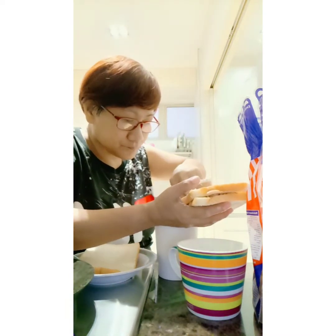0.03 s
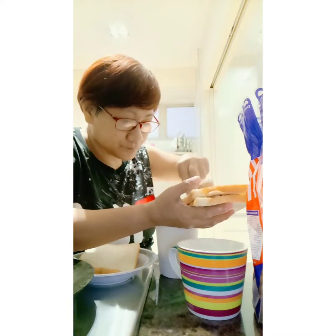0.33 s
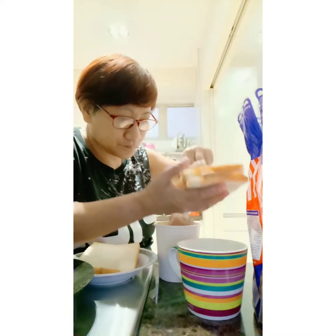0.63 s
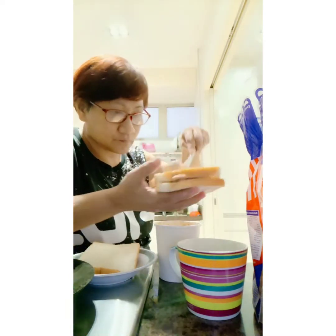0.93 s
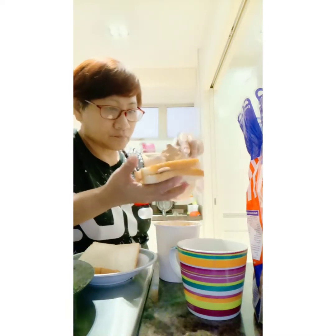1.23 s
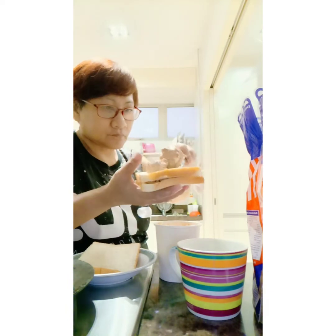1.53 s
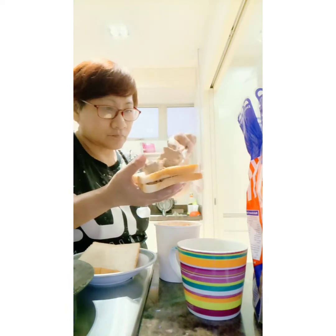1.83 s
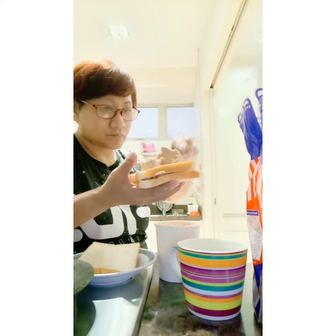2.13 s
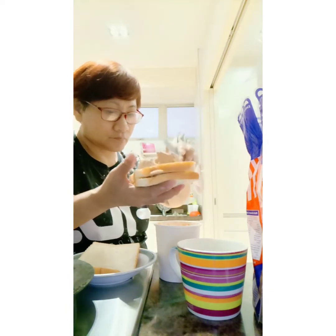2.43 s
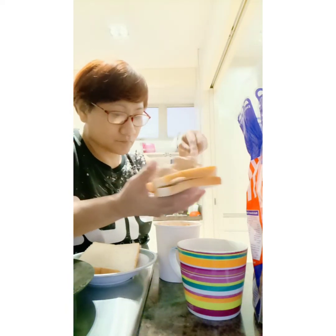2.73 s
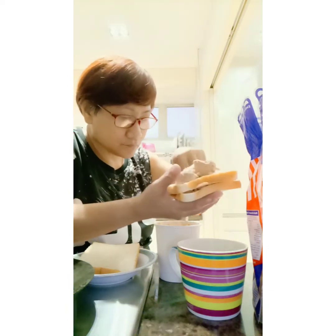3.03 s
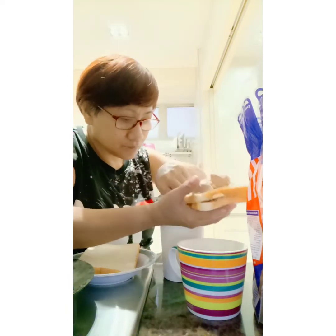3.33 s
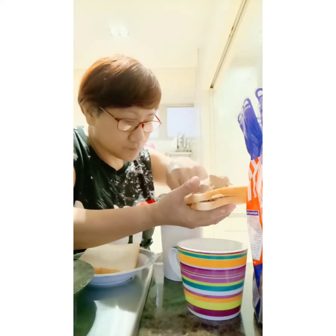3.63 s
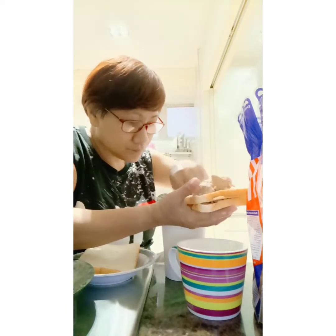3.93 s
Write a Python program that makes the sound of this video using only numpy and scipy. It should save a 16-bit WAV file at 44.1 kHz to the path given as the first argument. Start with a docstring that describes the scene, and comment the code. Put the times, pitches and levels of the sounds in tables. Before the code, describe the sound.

Dull knife knocks on a plastic tub, with faint scrapes across bread over room hiss.

```python
"""Over room hiss and an appliance's hum, a knife knocks on a plastic tub and scrapes on bread, by turns.
The slice is spread and turned in the hands in a small, hard-walled kitchen. Each dull knock excites
damped modes of the tub. Stick-slip friction makes the knife's soft scrapes and faint squeaks and the
rustle of the fingers; the bread rubs softly on the palm. The walls add a short reverberation."""
import sys
import numpy as np
from scipy import signal
from scipy.fft import rfft, irfft
from scipy.io import wavfile
from scipy.ndimage import uniform_filter1d

SR = 44100
rng = np.random.default_rng(int(sys.argv[2]) if len(sys.argv) > 2 else 0)


def store_wav(level_fs):
    """Save 16-bit WAV to argv[1]."""
    pcm = np.round(np.clip(np.atleast_2d(level_fs), -1, 1) * 32767)
    wavfile.write(sys.argv[1], SR, pcm.T.astype(np.int16))


N = 176400
TIME = np.arange(N) / SR
FREQS = np.maximum(np.arange(N // 2 + 1) * SR / N, 1)

# Levels in the tables are relative.
# room noise: (frequency [Hz], level [dB])
AIR_SPECTRUM = [(25, -15), (50, -2), (66, -2.5), (100, 5.5), (150, -9.5), (185, 0.5), (230, -0.5),
                (300, -6.5), (420, -3), (600, -4.5), (800, -17), (1100, -16.5), (1600, -21.5),
                (2050, -19.5), (2600, -17), (3200, -19.5), (3900, -22), (5600, -22.5), (8000, -28.5),
                (9800, -30), (12500, -29.5), (15500, -35.5)]
# balance of the room noise: (frequency [Hz], left minus right [dB])
AIR_BALANCE = [(250, 1.5), (500, 1.5), (1000, 3), (2500, 0.7), (5000, 1), (8000, -4), (12000, 7)]
# diffuse field: (frequency [Hz], left-right correlation [0..1])
COHERENCE = [(250, 1), (500, 0.9), (1000, 0.026), (2000, 0), (14000, 0)]
# reflections from counter and near walls: (left delay [s], right delay [s], level [dB])
REFLECTIONS = [(.0045, .0032, -26), (.0085, .0098, -20), (.018, .0167, -46)]
# appliance resonances: (frequency [Hz], half-width [Hz], level [dB])
HUM_BANDS = [(102.7, 11.7, -54), (147, 12.1, -45.5)]
# chance swells and dips of the hum, applied about their mean: (time [s], level [dB])
HUM_SWELLS = [(0.0, -45.5), (0.96, -45.5), (1.0, -56), (1.27, -42.5), (1.51, -47), (2.87, -49.5),
              (3.05, -41), (3.12, -54.5), (3.16, -44.5), (3.52, -47.5), (3.54, -36.5), (3.61, -59.5),
              (3.71, -45.5), (3.93, -46.5), (3.97, -57), (4.0, -36)]
# bread on the palm: (peak time [s], rise [s], fall [s], level [dB])
PALM_RUBS = [(0.09, 0.044, 0.022, -46.5), (3.03, 0.0067, 0.034, -46), (3.182, 0.005, 0.038, -41.5),
             (3.42, 0.027, 0.024, -44.5), (3.5, 0.067, 0.061, -43), (3.87, 0.028, 0.051, -44.5)]
# colour of that rubbing: (frequency [Hz], level [dB])
RUB_SPECTRUM = [(150, -7), (400, 4.5), (700, 0), (1200, -12.5), (2500, -26.5)]
# finger movements: (peak time [s], rise [s], fall [s], level [dB])
FINGER_RUSTLES = [(0.14, 0.096, 0.061, -57), (0.412, 0.0062, 0.034, -48), (0.55, 0.015, 0.051, -60),
                  (0.75, .015, 0.035, -62), (0.928, 0.015, 0.0084, -56), (1.19, 0.056, 0.039, -55.5),
                  (1.506, 0.012, 0.13, -56.5), (1.73, 0.0074, 0.0095, -53.5), (2.128, 0.015, 0.1, -53),
                  (2.44, 0.049, 0.13, -54.5), (2.64, 0.057, 0.12, -60), (3.053, 0.0076, 0.03, -44),
                  (3.17, .05, 0.085, -51.5), (3.34, 0.069, 0.13, -58), (3.497, 0.069, 0.033, -50.5),
                  (3.84, 0.045, .08, -58)]
# colour of their rustle: (frequency [Hz], level [dB])
RUSTLE_SPECTRUM = [(3000, -1), (6000, -4.5), (8500, -1), (9800, -5.5), (11300, 0.5), (13500, -1),
                   (15500, -17)]
# friction strokes: (peak time [s], rise [s], fall [s], level [dB], centre [Hz], width [octaves])
FINGERTIP_BRUSHES = [(0.928, 0.012, 0.009, -56, 13100, .09), (1.505, 0.008, 0.093, -52.5, 12800, 0.31)]  # thin and bright
KNIFE_SCRAPES = [(0.08, 0.028, .03, -53.5, 4400, 0.41), (0.135, 0.021, 0.077, -53, 4900, 0.73),
                 (0.8, 0.54, 0.38, -63, 3220, 0.086), (1.172, 0.01, 0.094, -47, 5160, 0.45),
                 (2.131, 0.009, 0.053, -41.5, 5630, 0.37), (3.025, 0.0064, 0.22, -53, 3760, 0.59),
                 (3.094, 0.0033, 0.012, -41, 6400, 0.27), (3.12, 0.021, 0.023, -46.5, 5200, 0.57),
                 (3.16, 0.019, 0.0076, -45, 5600, 0.18), (3.178, 0.013, 0.021, -40, 3250, 0.61),
                 (3.47, 0.081, 0.1, -50, 2660, 0.31), (3.502, 0.025, 0.018, -38.5, 3300, 0.63),
                 (3.85, 0.055, 0.075, -52, 3750, 0.62)]  # mostly broad bands
KNIFE_SQUEAKS = [(0.412, 0.0032, 0.013, -45.5, 2460, 0.036), (1.022, 0.008, 0.023, -47.5, 2713, 0.0084),
                 (2.587, 0.018, 0.043, -50, 2860, 0.14), (2.65, .04, .04, -59.5, 3120, .025),
                 (3.43, 0.03, .04, -53, 3120, 0.036), (3.776, 0.0043, 0.024, -49, 2540, .09)]  # narrow bands: faint squeaks and chinks
# knife on tub: (time [s], level [dB], pitch [Hz], t60 [s], thud re knock [dB], tick re knock [dB])
TUB_KNOCKS = [(0.2552, -32.5, 615, 0.065, -10, -11), (0.4079, -20, 520, 0.01, -19, -18),
              (0.4095, -20.5, 857, 0.027, -8, -29), (0.4160, -24.5, 550, 0.012, -5, -24),
              (0.4225, -29, 800, 0.019, -4, -34), (0.4282, -23, 477, 0.018, -10, -27),
              (0.4436, -14, 790, 0.015, -14, -23.5), (0.4625, -21.5, 754, 0.0091, -8, -21.5),
              (0.4818, -19.5, 810, 0.0051, -20, -27), (0.501, -26, 764, 0.0045, -6, -34),
              (0.888, -37.5, 560, 0.0063, -11, -20), (3.021, -33.5, 613, 0.0051, -18, -13),
              (3.0523, -16, 855, 0.010, -15, -26.5), (3.0697, -35, 794, 0.005, -11, -26),
              (3.2325, -18.5, 760, 0.01, -2.5, -25), (3.7740, -30.5, 567, 0.031, 4.5, -10),
              (3.794, -37, 552, .04, 6, -26), (3.866, -39.5, 628, 0.092, -12, -20)]
# modes of the tub: (frequency [Hz], level [dB], t60 [s])
TUB_MODES = [(447, -25.5, 0.12), (617, -19.5, 0.045), (771, -28, 0.13), (933, -39, 0.051),
             (1200, -27, 0.069)]
# colour of the contact tick: (frequency [Hz], level [dB])
TICK_SPECTRUM = [(1200, 7), (1800, 2.5), (2550, 6.5), (3200, 8), (3900, 1), (5800, 4), (9000, -26),
                 (14000, -13)]

MONO_BELOW_HZ = 150
EARLY_T60_S, LATE_T60_S, LATE_DB = 0.061, 0.46, -14  # dense early reflections, then a weaker tail
THUD_HZ, THUD_T60_S, TICK_T60_S = 412, 0.022, 0.051
BUILD_S, BODY_LOW_HZ = 0.00023, 328  # the wall takes a moment to swing and radiates little bass
CONTACT_HZ = 1103  # a soft contact excites little above this


def from_db(db):
    """Amplitude grows tenfold for every 20 dB."""
    return 10 ** (np.asarray(db) / 20)


def rms_one(x):
    """Normalisation to unit mean power."""
    return x / np.sqrt(np.mean(x ** 2) + 1e-20)


def curve(points):
    """Interpolation of (frequency [Hz], value) along a logarithmic frequency axis."""
    hz, value = np.transpose(points)
    return np.interp(np.log(FREQS), np.log(hz), value)


def colour(x, db):
    """Filtering multiplies the spectrum by a gain; the result has unit rms."""
    return rms_one(irfft(rfft(x) * from_db(db), N))


def pan(db):
    """A level difference gives direction: left rises by db, right falls by db."""
    return from_db(np.array([[1], [-1]]) * db)


def swell(peak_s, rise, fall):
    """Amplitude envelope of a movement: Gaussian rise, exponential decay."""
    return np.exp(-(np.minimum(TIME - peak_s, 0) / rise) ** 2 - np.maximum(TIME - peak_s, 0) / fall)


def diffuse():
    """A diffuse field of white noise: long waves reach left and right alike, short ones do not."""
    mid, side = rfft(rng.standard_normal((2, N)))
    alike = curve([(MONO_BELOW_HZ, 1)] + COHERENCE)
    return irfft(np.sqrt(1 + alike) * mid + np.sqrt(1 - alike) * side * [[1], [-1]], N) / np.sqrt(2)


def room_hiss(level_db=-45.5):
    """Stationary diffuse noise, strongest in the bass."""
    lean_db = curve([(MONO_BELOW_HZ, 0)] + AIR_BALANCE) * [[.5], [-.5]]
    return from_db(level_db) * colour(diffuse(), curve(AIR_SPECTRUM) + lean_db)


def narrow_band(hz, half_width):
    """A resonance driven by noise gives a fluctuating tone."""
    return colour(rng.standard_normal(N), -20 * np.log10(1 + ((FREQS - hz) / half_width) ** 2))


def appliance(drone_hz=34.55, drone_db=-53):
    """Narrow-band noise gives a low hum with irregular, chance swells and dips, above a deep drone."""
    hum = sum(from_db(db) * narrow_band(hz, half_width) for hz, half_width, db in HUM_BANDS)
    hum = hum / np.sqrt(uniform_filter1d(rms_one(hum) ** 2, size=6000))  # level out the running power
    times, level_db = np.transpose(HUM_SWELLS)
    swells = from_db(np.interp(TIME, times, level_db - level_db.mean()))
    drone = np.sin(2 * np.pi * drone_hz * TIME) + .35 * narrow_band(drone_hz, 5.5)
    return swells * hum + from_db(drone_db) * rms_one(drone)


def kitchen(x, wet_db, onset_s=0.0057):
    """Reverberation: the direct sound plus its convolution with a diffuse, two-slope decay."""
    decay = from_db(-60 * TIME / EARLY_T60_S) + from_db(LATE_DB - 60 * TIME / LATE_T60_S)
    tail = diffuse() * decay * (1 - np.exp(-TIME / onset_s))
    response = rms_one(tail[:, :SR]) / np.sqrt(SR)  # unit energy
    return x + from_db(wet_db) * signal.fftconvolve(x, response, axes=1)[:, :N]


def palm_rubs():
    """Sliding friction of bread on skin gives dull, smooth noise."""
    envelope = sum(from_db(db) * swell(peak_s, rise, fall) for peak_s, rise, fall, db in PALM_RUBS)
    return envelope * colour(diffuse(), curve(RUB_SPECTRUM)) * pan(0.5)


def friction(slips_per_s=2500, spread_db=4, slip_share=0.19):
    """Stick-slip friction: tiny random slips of uneven size share the power with a smooth hiss."""
    sizes = from_db(spread_db * np.minimum(rng.exponential(1, N), 4))
    slips = (rng.random(N) < slips_per_s / SR) * sizes * rng.standard_normal((2, N))
    return np.sqrt(slip_share) * rms_one(slips) + np.sqrt(1 - slip_share) * rng.standard_normal((2, N))


def strokes(rows):
    """Source and filter: friction drives one resonance in each stroke."""
    sound, grit = 0, friction()
    for peak_s, rise, fall, db, hz, octaves in rows:
        resonance_db = -20 * np.log10(1 + (np.log2(FREQS / hz) / octaves) ** 2 / 2)
        sound = sound + from_db(db) * swell(peak_s, rise, fall) * colour(grit, resonance_db)
    return sound


def fingers():
    """Incoherent friction rustles add in power; the fingertips add bright brushes."""
    power = sum((from_db(db) * swell(peak_s, rise, fall)) ** 2
                for peak_s, rise, fall, db in FINGER_RUSTLES)
    rustle = np.sqrt(power) * colour(friction(), curve(RUSTLE_SPECTRUM))
    return pan(3) * (rustle + strokes(FINGERTIP_BRUSHES))


def knife_strokes():
    """Bandwidth sets the timbre of friction: a broad resonance scrapes, a narrow one squeaks."""
    return strokes(KNIFE_SCRAPES) + pan(5.5) * strokes(KNIFE_SQUEAKS)


def ring(age, hz, t60):
    """Free vibration of a damped mode, which loses 60 dB in t60 seconds."""
    return np.sin(2 * np.pi * hz * age) * from_db(-60 * age / t60)


def knife_knocks():
    """Impact excitation: each soft contact rings the tub's damped modes and sets off a gritty tick."""
    thocks, tick_envelope = np.zeros(N), np.zeros(N)
    for time_s, db, hz, wall_t60, thud_db, tick_db in TUB_KNOCKS:
        start = int(time_s * SR)
        age = TIME[:min(SR // 2, N - start)]
        span = slice(start, start + len(age))
        wall = ring(age, hz, wall_t60) * (1 - np.exp(-age / BUILD_S))
        thud = from_db(thud_db) * ring(age, THUD_HZ, THUD_T60_S)
        modes = sum(from_db(mode_db) * ring(age, mode_hz, t60) for mode_hz, mode_db, t60 in TUB_MODES)
        thocks[span] += from_db(db) * (wall + thud + modes)
        tick_envelope[span] += from_db(db + tick_db - 60 * age / TICK_T60_S)
    radiated_band = signal.butter(3, [BODY_LOW_HZ, CONTACT_HZ], "band", fs=SR, output="sos")
    thocks = signal.sosfilt(radiated_band, thocks)
    echoes = sum(from_db(db) * np.interp(TIME - np.array([[left], [right]]), TIME, thocks)
                 for left, right, db in REFLECTIONS)
    ticks = tick_envelope * colour(friction(), curve(TICK_SPECTRUM))
    return pan(1.7) * (thocks + echoes) + ticks


def scene():
    """Superposition of the reverberant knife and fingers, the dry rubbing and the background."""
    knocks = kitchen(knife_knocks(), wet_db=-6.5)
    handling = from_db(-1) * kitchen(fingers() + knife_strokes(), wet_db=-8.5)
    return knocks + handling + palm_rubs() + room_hiss() + appliance()


def record(dry, cutoff_hz=15250):
    """Band limiting: a steep elliptic low-pass removes the highest treble."""
    return signal.sosfilt(signal.ellip(10, .2, 80, cutoff_hz, fs=SR, output="sos"), dry)


dry = scene()
out = record(dry)
store_wav(out)
```